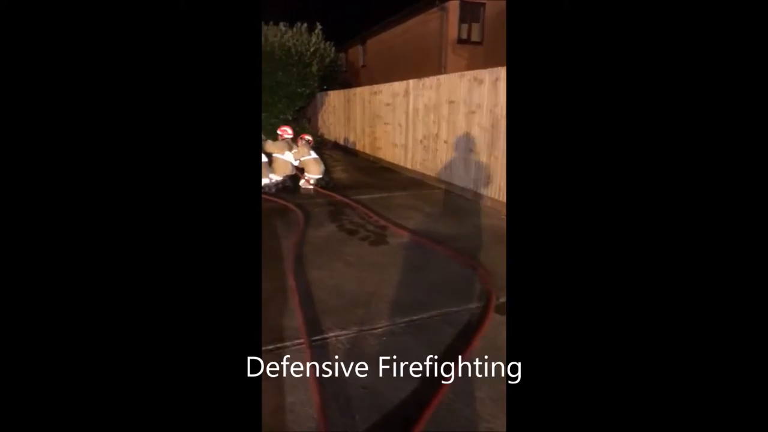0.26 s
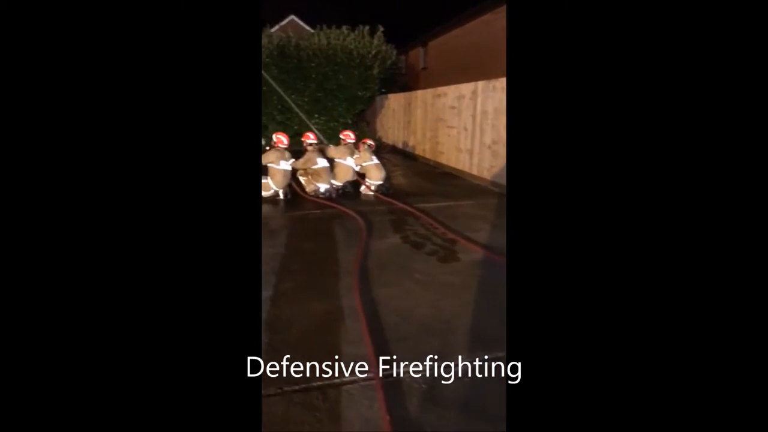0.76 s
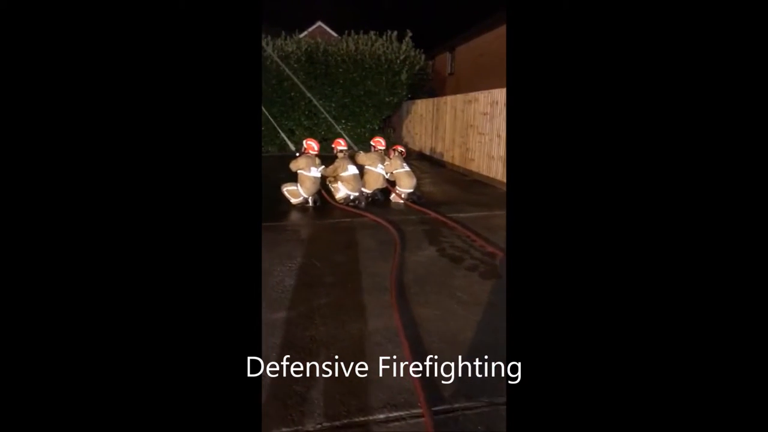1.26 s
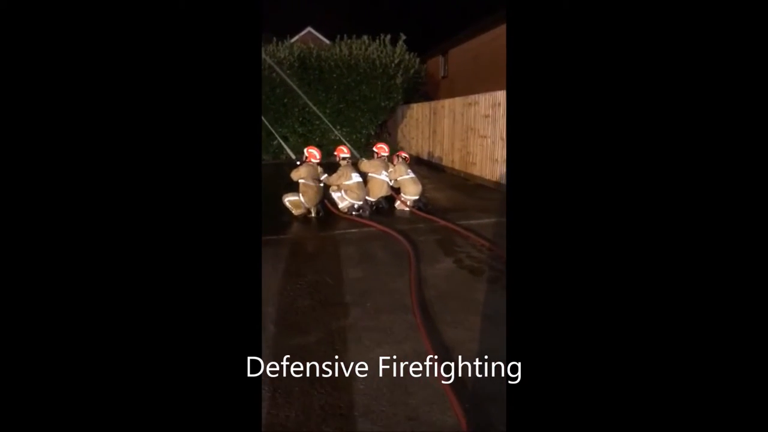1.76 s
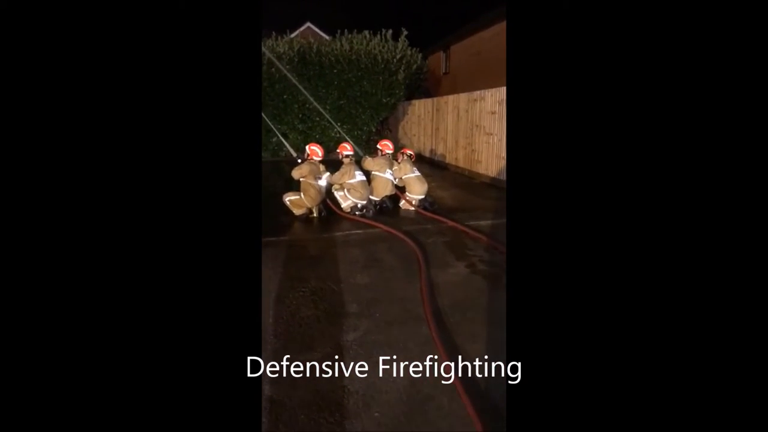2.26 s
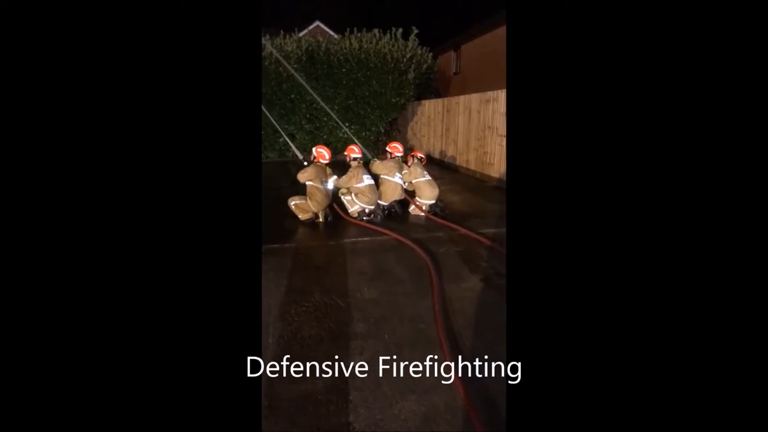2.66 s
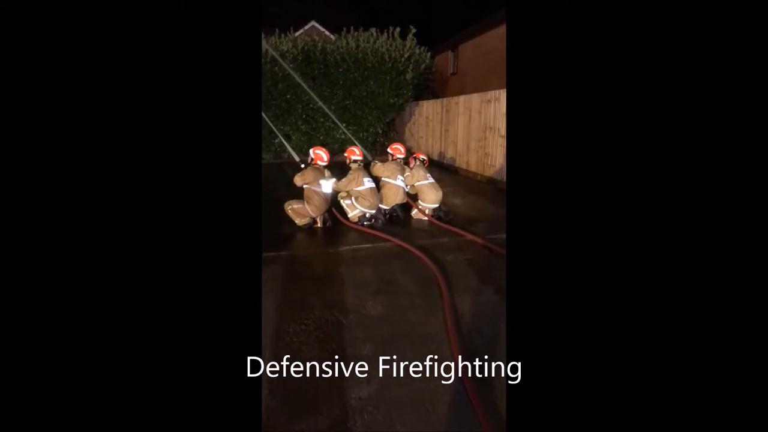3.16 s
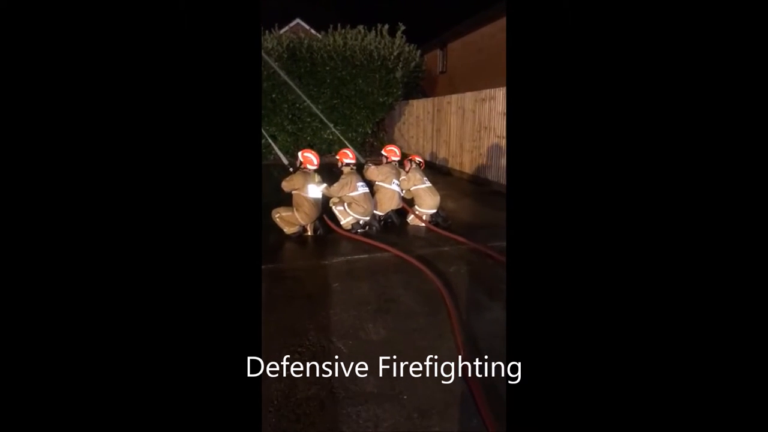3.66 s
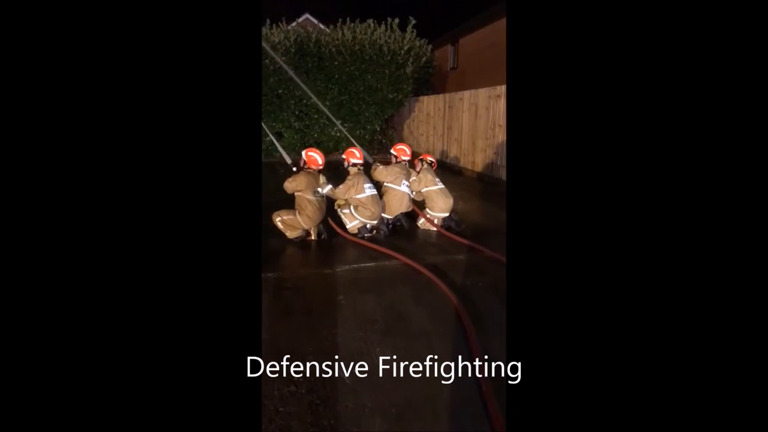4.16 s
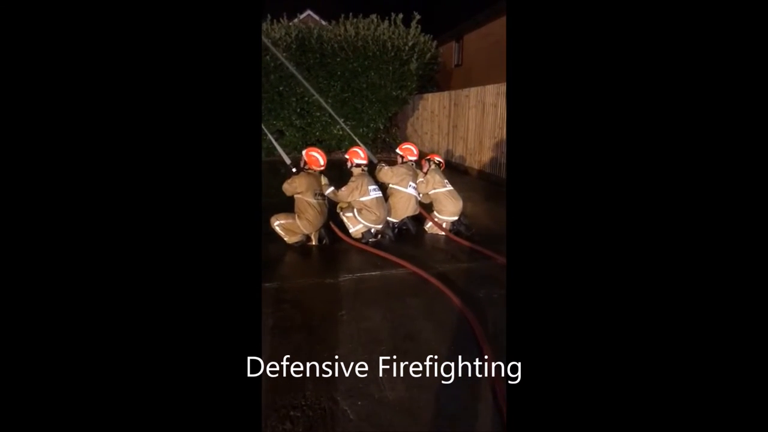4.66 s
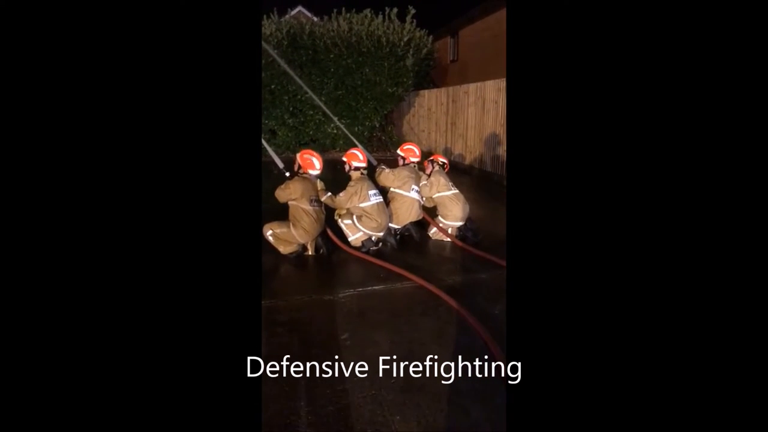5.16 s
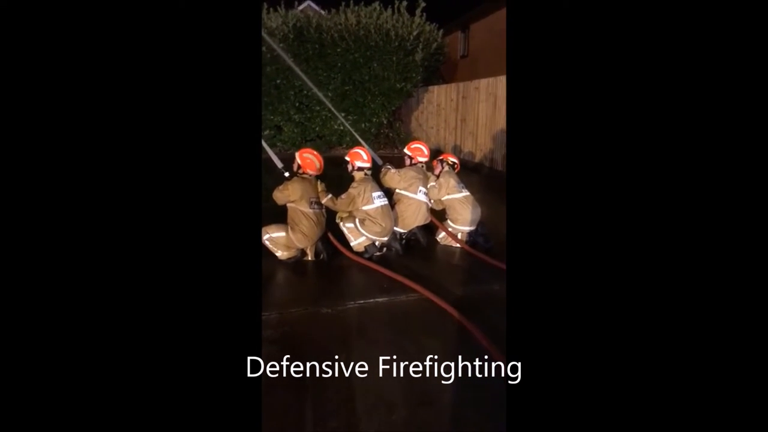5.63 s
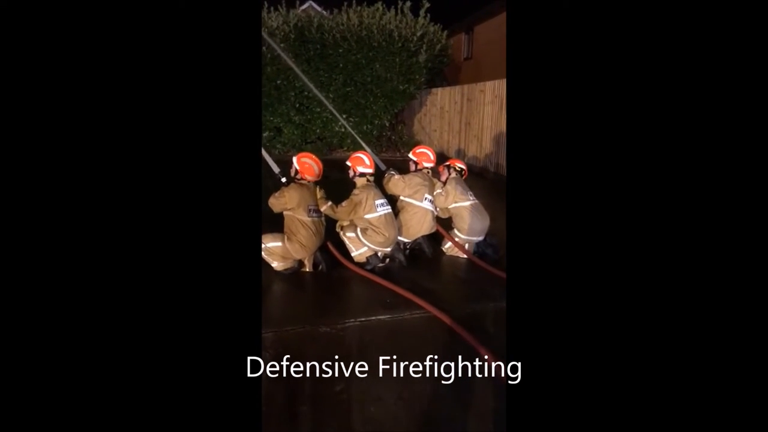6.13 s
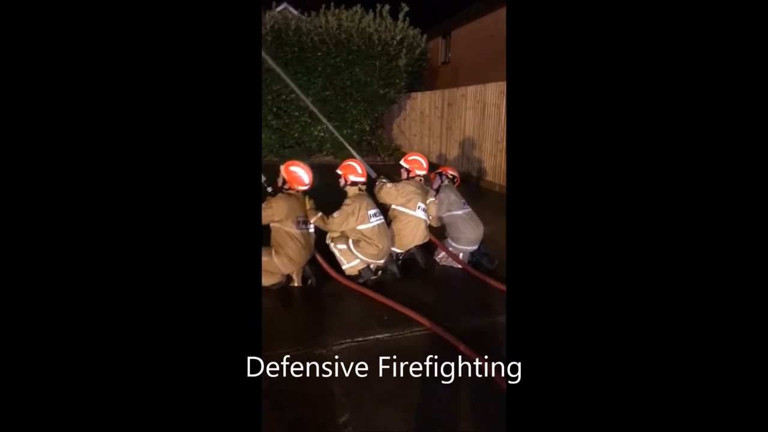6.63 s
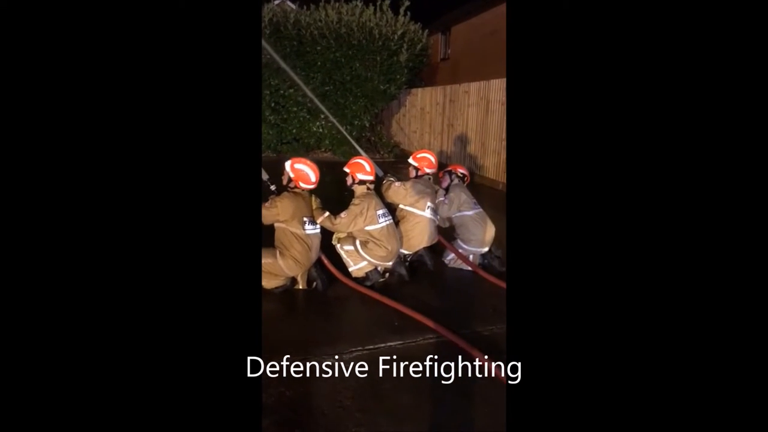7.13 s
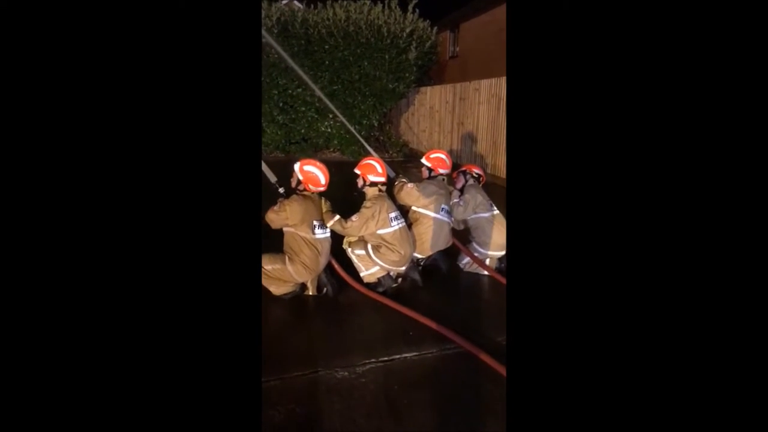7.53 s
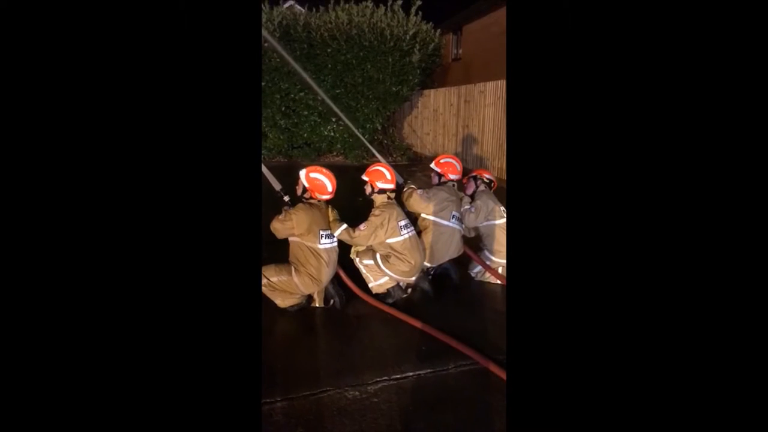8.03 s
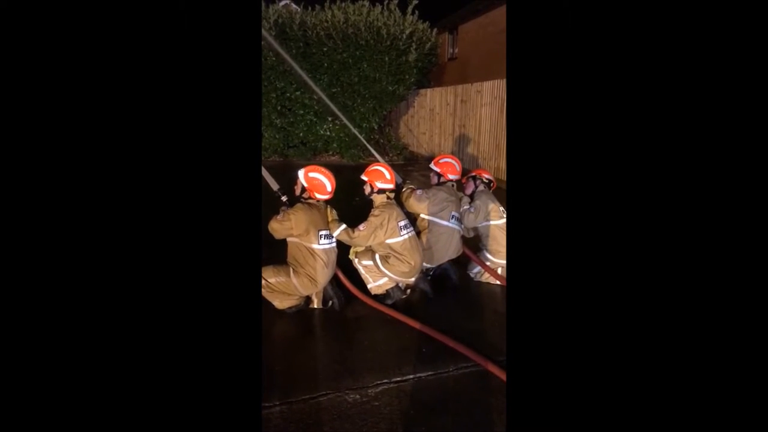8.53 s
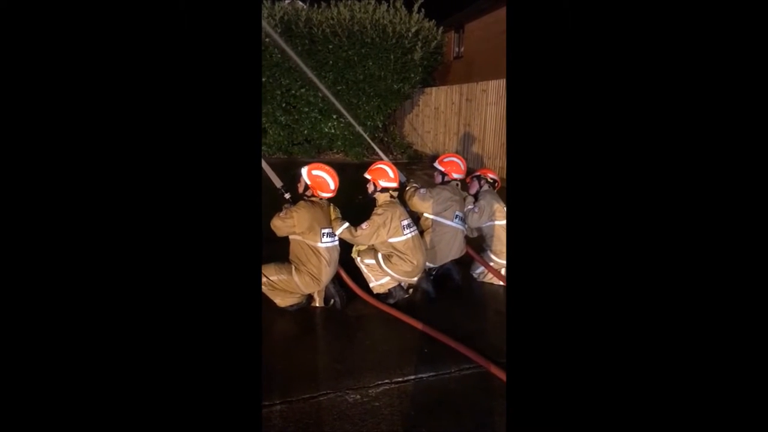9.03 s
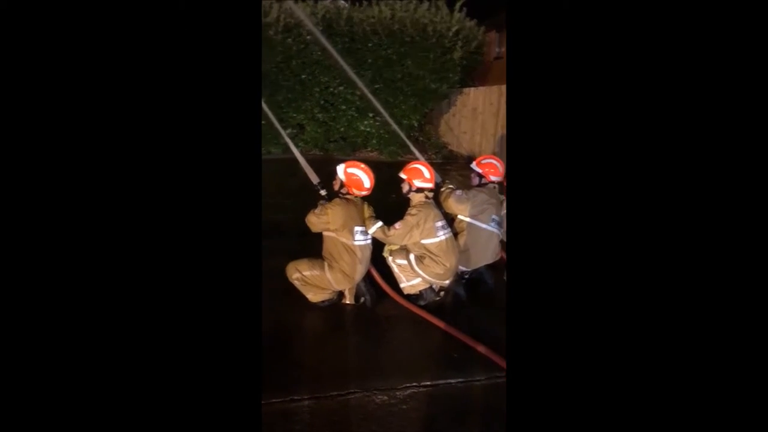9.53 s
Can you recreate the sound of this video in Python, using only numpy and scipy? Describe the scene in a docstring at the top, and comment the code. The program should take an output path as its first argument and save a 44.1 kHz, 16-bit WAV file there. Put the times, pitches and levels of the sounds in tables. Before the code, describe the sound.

From the start, fire hoses spray water across an outdoor yard with a steady, bright hiss, blended with the softer rush of spray landing farther away. Underneath, several engines run with a low, slowly pulsing hum and rumble, and pumps add a faint thin whine. Dull, soft footsteps bump the handheld microphone at irregular moments, at about 1.3 seconds, more often between 3 and 6, and again near 7 and 8. Around 4.5 seconds the hiss surges and stays slightly louder. A few brief splashes on a hard surface follow until about 5.5 seconds, and a nozzle gives a short crackling spit of air near 5.9. Throughout, the hiss occasionally dips for an instant, leaving a tiny faint ringing blip. Water and engines continue until the end, at almost 10 seconds.

```python
"""Two fire hoses throw steady jets across a yard at night, heard while walking up behind the crews.
Turbulent shear tears the water into hissing droplets, whose impacts far off merge into a rush.
Four engines radiate harmonics of their four-stroke cycles, and tones of nearby frequency beat.
Pumps whine faintly and footsteps thud. Now and then the hiss dips for an instant as a few tones ring."""
import sys
import numpy as np
from scipy import signal
from scipy.fft import rfft, irfft
from scipy.io import wavfile
from scipy.ndimage import uniform_filter1d

SR = 44100
rng = np.random.default_rng(int(sys.argv[2]) if len(sys.argv) > 2 else 0)


def dump(signal):
    """Clip the signal to [-1, 1] and save it as 16-bit WAV at the path in sys.argv[1]."""
    limited = np.clip(np.atleast_2d(signal).T, -1, 1)
    pcm = np.round(limited * 32767).astype(np.int16)
    wavfile.write(sys.argv[1], SR, pcm)


N = 431738
TIME = np.arange(N) / SR
HZ = np.fft.rfftfreq(N, 1 / SR)

# spectrum of the nozzle hiss: (frequency [Hz], relative density [dB])
HISS_SPECTRUM = [(250, -7.5), (500, -8.5), (800, -7.5), (1300, -7), (2200, -2.5), (2750, -0.5),
                 (4400, -1.03), (5600, -2.5), (7000, -2.5), (8600, -3), (9700, -4.5), (10400, -10)]
# surges as a jet swings: (time [s], rise [dB], length [s], tilt toward treble [dB])
JET_SURGES = [(.45, 1.6, 0.11, -0.5), (4.45, 2.5, 0.37, 0.5), (4.812, 1, 0.23, 0), (5.04, 2, 0.13, 0.6),
              (5.3, 0.5, 0.23, 0.5), (5.54, 1.3, 0.24, 0.5), (6.018, 1, 0.14, 0.5), (7.385, 1.9, 0.14, 1),
              (9.417, 0.5, 0.5, 0)]
# air bursting from a nozzle: (time [s], level [dB], decay [s])
NOZZLE_SPITS = [(5.852, -28.5, 0.017), (5.87, -25, 0.003), (5.878, -31, 0.025)]
# spectrum of the spray landing far off: (frequency [Hz], relative density [dB])
SPRAY_SPECTRUM = [(200, -4), (450, -9), (560, -5.5), (780, -6.5), (1030, -1), (1380, 2.5), (1600, -2),
                  (1900, -3.5), (2300, -8), (4000, -17.5)]
# a jet sweeping over something hard: (time [s], level [dB], decay [s])
JET_SPLASHES = [(4.765, -27, 0.032), (5.175, -29.5, .04), (5.31, -33, 0.054), (5.5, -37, .06)]
# peaks and hollows of the water's noise between walls: (frequency [Hz], width [Hz], gain [dB])
YARD_RESONANCES = [(1070, 120, 0.6), (1480, 86, 0.7), (1590, 80, -0.2), (1820, 140, 0.7), (2150, 140, -0.5),
                   (2530, 190, 1), (4120, 130, 0.7), (4610, 110, 1.2)]
# dips of the hiss: (time [s], hold [s], tone level [dB], lower tone [Hz], upper tone [Hz])
HISS_DIPS = [(.241, 0.0062, -45, 1055, 1604), (.54, 0.0035, -47, 2024, 2939),
             (.646, 0.0014, -41, 1345, 2300), (0.848, .022, -47, 1670, 2067), (1.35, 0, -42, 1470, 2490),
             (1.564, 0.0033, -44, 1765, 3348), (2.269, 0, -43, 1870, 5770), (2.353, 0, -41, 1750, 5300),
             (2.587, 0, -43, 2734, 5361), (3.25, 0, -43, 1281, 2770), (3.29, 0.0042, -43, 1205, 2357),
             (3.42, 0.003, -43, 1160, 1485), (3.547, 0.00093, -44, 3079, 3951), (3.654, 0, -45, 1440, 3316),
             (4.23, 0, -44, 1981, 2357), (4.315, 0.0083, -41, 1410, 1905), (4.401, 0, -42, 1399, 1905),
             (4.528, 0, -39, 1367, 4554), (5.147, 0.0017, -40, 1396, 1830), (5.704, 0, -39, 1324, 1710),
             (7.217, 0.0013, -38, 1399, 2368), (7.602, 0.0059, -43, 1302, 3154),
             (7.835, 0, -40, 1345, 2470), (8.39, 0, -39, 3746, 6416), (8.881, 0, -41, 1280, 2573),
             (9.628, 0, -42, 1270, 1711)]
# harmonics of three six-cylinder engines and a small four: (cycle multiple [1], base rms level [dB])
IDLE_HARMONICS = [(6, -38.5), (7, -52), (12, -48), (15, -49.5), (16, -58), (17, -57.5), (18, -55.5),
                  (19, -65), (20, -56), (21, -54.5), (23, -51.5), (24, -55), (25, -64), (28, -61),
                  (30, -55.5), (32, -62), (33, -59.5), (34, -61.5), (36, -60.5), (38, -60), (39, -59.5),
                  (40, -58), (42, -71), (44, -70), (46, -65), (48, -62.5), (49, -64.5)]
PUMP_HARMONICS = [(6, -38.5), (12, -43), (13, -59), (14, -69), (15, -64), (16, -55), (18, -43), (19, -63),
                  (20, -54.5), (21, -57), (22, -59), (23, -72), (24, -57.5), (28, -60), (30, -72.5)]
FAR_HARMONICS = [(6, -46), (8, -51.5), (9, -59), (10, -46.5)]
SMALL_HARMONICS = [(4, -69), (6, -44)]
# gains of the idling engine along the walk: (time [s], firing tone [dB], octave [dB], growl [dB])
IDLE_SWELLS = [(0, -3, 3, -2), (.7, 1, 10.5, 9), (1.5, -11, 4, 6.5), (3.3, -16, -6, 7.5), (5.3, -5, 1, 2),
               (6.8, -5, -0.5, 6.5), (8, 2, -0.5, 2), (9.79, -1.5, 1, -9)]
# gains of the pumping engine between walls: (time [s], firing tone [dB], octave [dB], twelfth [dB])
PUMP_SWELLS = [(0, -4, -14, 3), (0.35, 6.5, -3, -16), (0.9, 3, -1, -3.5), (1.3, 2.5, 3, -4),
               (2, 1, 0.5, -2), (2.8, 2, -1, 1.5), (3.3, -27, -19, -11), (3.7, 5, 5, -16),
               (4.1, -4, -7, 1.5), (4.4, 3.5, -16, -2.5), (4.75, 0, -15, -3), (5.05, 3.5, -11, -20),
               (5.65, -3.5, -11, -5), (6.05, 4, -0.5, -4.5), (6.45, -1, 1.5, 0), (7.5, -2, 0, 0),
               (8.3, -2.5, -6.5, 0), (9.79, -5, 0, 0)]
# spectrum of the rumble of engines and yard: (frequency [Hz], relative density [dB])
RUMBLE_SPECTRUM = [(10, -26), (25, -12.5), (38, -1), (52, 1.5), (70, 4.5), (100, -2.5), (140, -6),
                   (175, -2.5), (220, -6.5), (300, -9), (420, -17), (700, -36)]
# strength of the rumble along the walk: (time [s], level [dB])
RUMBLE_LEVELS = [(0, -43), (1.8, -43.5), (3.2, -41.5), (3.9, -40.5), (5.1, -42.5), (6.1, -40.5), (6.6, -45),
                 (8.3, -44), (9.79, -41.5)]
# whines of the pumps: (frequency [Hz], early level [dB], late level [dB], time of change [s])
PUMP_WHINES = [(346.5, -51.5, -61.5, 1.7), (540, -60, -55.5, 3.9)]
# jolts of walking: (time [s], level [dB], decay [s])
STEP_THUDS = [(.69, -38, .05), (1.32, -30.5, 0.049), (2.5, -40, 0.036), (3.28, -30, .03),
              (3.335, -34, .035), (3.83, -38, 0.14), (4.055, -35, 0.024), (4.19, -35, 0.043),
              (4.68, -33.5, .04), (4.83, -30, .018), (5.31, -28.5, 0.052), (5.465, -30, .025),
              (5.87, -34, .04), (7.205, -27.5, 0.032), (7.98, -31.5, 0.068)]

DIP_FADE_S = 0.019


def jets(shielded_db=-34, open_db=-32.5, open_at_s=4.66, opening_s=0.13, crossover_hz=5000):
    """Turbulent shear tears the jets into hissing drops, louder once out of the crews' acoustic shadow."""
    shear = turbulence(patchy_db=0.9, lingering_db=0.56)
    droplets = gain_of(-9.5) * drops(per_s=5000, spread_db=2)
    hiss = colour(shear + droplets, HISS_SPECTRUM)
    roar = low_band(hiss, crossover_hz)
    openness = smooth_step(open_at_s, opening_s)
    level_db = shielded_db + (open_db - shielded_db) * openness + 0.78 * wander(rate_hz=24)
    tilt_db = -0.25 * openness
    for s, rise_db, length, fizz_db in JET_SURGES:
        swell = np.exp(-(2 * (TIME - s) / length) ** 2)
        level_db += rise_db * swell
        tilt_db += fizz_db * swell
    return roar * gain_of(level_db - tilt_db) + (hiss - roar) * gain_of(level_db + tilt_db)


def turbulence(patchy_db, lingering_db, patch=(9, 16), streak=(3, 140)):
    """Intermittency: noise varies in quick wide patches and lasting narrow streaks, each (bins, frames)."""
    spectra = signal.stft(rng.standard_normal(N), nperseg=512)[2]
    drift_db = np.zeros(spectra.shape)
    for depth_db, (bins, frames) in ((patchy_db, patch), (lingering_db, streak)):
        bands = uniform_filter1d(rng.standard_normal(spectra.shape), bins, axis=0)
        drift_db += depth_db * unit_rms(uniform_filter1d(bands, frames, axis=1))
    return unit_rms(signal.istft(spectra * gain_of(drift_db), nperseg=512)[1][:N])


def drops(per_s, spread_db):
    """Shot noise: independent impacts, mostly small, a few large."""
    sizes = gain_of(spread_db * np.minimum(rng.exponential(1, N), 4))
    return unit_rms(sizes * rng.choice([-1, 1], N) * (rng.random(N) < per_s / SR))


def spits():
    """Sudden expansion: air pockets burst out of a nozzle with a short crackle."""
    crackle = colour(rng.standard_normal(N), [(1000, -18), (3400, 1), (5000, -4), (10000, -5)])
    return bursts(NOZZLE_SPITS, rise_s=0.00023) * crackle


def spray(level_db=-38.5):
    """Incoherent summation: countless drops land on walls and ground and merge into a rush."""
    rush = turbulence(patchy_db=1.6, lingering_db=0.6, patch=(4, 6), streak=(2, 80))
    spatter = gain_of(-9) * drops(per_s=1800, spread_db=2.5)
    return colour(rush + spatter, SPRAY_SPECTRUM) * gain_of(level_db)


def splashes():
    """Impact noise: water breaks on a hard surface in short diffuse swells."""
    spectrum = [(1500, -22), (2400, 0), (2900, 7), (3500, -5), (4500, -21)]
    return bursts(JET_SPLASHES, rise_s=0.02) * colour(rng.standard_normal(N), spectrum)


def dipped(x, floor_db=-31.5, above_hz=235):
    """Amplitude modulation: at each dip everything above the bass sinks and comes straight back."""
    level = np.ones(N)
    for s, hold, *_ in HISS_DIPS:
        level *= dip_ramp(TIME - s, hold)
    bass = low_band(x, above_hz)
    return bass + (x - bass) * np.maximum(np.sin(np.pi / 2 * level), gain_of(floor_db))


def dip_tones(faint_count=9, faint_db=-48, faint_range_hz=(1800, 9980), size=4096):
    """Superposition: two clear sinusoids and fainter scattered ones ring through each dip."""
    out = np.zeros(N)
    offsets = np.arange(size) - size // 2
    t = offsets / SR
    for s, hold, db, *clear_hz in HISS_DIPS:
        faint_hz = np.exp(rng.uniform(*np.log(faint_range_hz), faint_count))
        hz = np.concatenate([clear_hz, faint_hz])
        gains = gain_of([db] * len(clear_hz) + [faint_db] * faint_count)
        tones = gains @ np.sin(2 * np.pi * (hz[:, None] * t + rng.random((len(hz), 1))))
        swell = np.cos(np.pi / 2 * dip_ramp(t, hold))
        out[round(s * SR) + offsets] += np.sqrt(2) * swell * tones
    return out


def engines():
    """Beating: four engines run at different speeds, so their neighbouring tones interfere."""
    firing, octave, growl = curves(IDLE_SWELLS)
    idle_swells = {6: firing, 12: octave, 18: growl, 21: growl, 23: growl / 2}
    pump_swells = dict(zip((6, 12, 18), curves(PUMP_SWELLS)))
    idling = engine(IDLE_HARMONICS, idle_swells, cycle_hz=7.508, drift=0.00056)
    pumping = engine(PUMP_HARMONICS, pump_swells, cycle_hz=9.173, drift=0.00088)
    far = engine(FAR_HARMONICS, {}, cycle_hz=8.959, drift=0.00052)
    small = engine(SMALL_HARMONICS, {}, cycle_hz=10.943, drift=0.00051, fading_db=-4.5)
    return idling + pumping + far + small


def engine(harmonics, swells, cycle_hz, drift, fading_db=0.5, in_step_s=5.17, in_step_below_hz=100):
    """Periodic firing makes harmonics; those in swells follow the walk, the rest fade by reflection."""
    turns = np.cumsum(cycle_hz * (1 + drift * wander(rate_hz=1.62))) / SR
    turns -= turns[round(in_step_s * SR)]  # the low tones of all engines fall into step here
    out = np.zeros(N)
    for multiple, db in harmonics:
        swell_db = swells.get(multiple, fading_db * wander(rate_hz=0.35))
        lag = rng.random() * (multiple * cycle_hz > in_step_below_hz)
        out += gain_of(db + swell_db) * np.sin(2 * np.pi * (multiple * turns + lag))
    return np.sqrt(2) * out


def rumble():
    """Low-frequency noise of the engines and the yard varies in strength along the walk."""
    noise = colour(rng.standard_normal(N), RUMBLE_SPECTRUM)
    return noise * gain_of(curves(RUMBLE_LEVELS)[0] + 0.57 * wander(rate_hz=1.7))


def whines(change_s=0.25):
    """Frequency and amplitude modulation: thin pump tones waver, each shifting level once on the walk."""
    out = np.zeros(N)
    for hz, early_db, late_db, s in PUMP_WHINES:
        turns = np.cumsum(hz * (1 + 0.00282 * wander(rate_hz=4.9))) / SR
        level_db = early_db + (late_db - early_db) * smooth_step(s, change_s)
        out += gain_of(level_db + 3 * wander(rate_hz=3.9)) * np.sin(2 * np.pi * turns)
    return out


def footsteps():
    """Structure-borne sound: steps jolt the hand-held microphone with dull thuds."""
    thud = colour(rng.standard_normal(N), [(70, -8), (140, 9), (260, 2), (400, -13.5), (800, -20)])
    return bursts(STEP_THUDS, rise_s=0.0025) * thud


def gain_of(db):
    """Decibels as an amplitude ratio."""
    return 10 ** (np.asarray(db) / 20)


def unit_rms(x):
    """Normalisation to rms 1."""
    return x / np.sqrt(np.mean(x ** 2) + 1e-20)


def curves(rows):
    """Linear interpolation of each column of a time table to every sample."""
    times, *columns = np.transpose(rows)
    return [np.interp(TIME, times, column) for column in columns]


def smooth_step(at_s, width_s):
    """A sigmoid transition from 0 to 1."""
    return 0.5 + 0.5 * np.tanh((TIME - at_s) / width_s)


def dip_ramp(offset_s, hold_s):
    """A trapezoidal envelope: 0 at the bottom of a dip, rising to 1 on either side."""
    return np.clip((abs(offset_s) - hold_s / 2) / DIP_FADE_S, 0, 1)


def bursts(rows, rise_s):
    """The envelope of transients with exponential rise and decay."""
    out = np.zeros(N)
    for s, db, decay in rows:
        age = np.maximum(TIME - s, 0)
        out += gain_of(db) * (1 - np.exp(-age / rise_s)) * np.exp(-age / decay)
    return out


def wander(rate_hz, size=2048):
    """Slow random fluctuation: low-passed noise of rms 1."""
    hz = np.fft.rfftfreq(size, N / SR / size)
    slow = irfft(rfft(rng.standard_normal(size)) / (1 + (hz / rate_hz) ** 2))
    return np.interp(np.arange(N), np.linspace(0, N, size), unit_rms(slow))


def colour(x, points):
    """Spectral shaping through (frequency [Hz], gain [dB]) points on a log axis, at rms 1."""
    hz, db = np.transpose(points)
    skirts = np.minimum(HZ / hz[0], 1) * np.minimum(hz[-1] / (HZ + 1), 1)
    shape_db = np.interp(np.log(HZ + 1), np.log(hz), db)
    return unit_rms(irfft(rfft(x) * skirts * gain_of(shape_db), N))


def low_band(x, cutoff_hz):
    """Zero-phase low-pass filtering."""
    return irfft(rfft(x) / (1 + (HZ / cutoff_hz) ** 8), N)


def peaked(x, peaks):
    """Bell-shaped resonances and notches: (frequency [Hz], width [Hz], gain [dB])."""
    shape_db = sum(db * np.exp(-((HZ - hz) / width) ** 2) for hz, width, db in peaks)
    return irfft(rfft(x) * gain_of(shape_db), N)


def scene():
    """Superposition at one microphone: all sources add, and both channels are alike."""
    water = peaked(jets() + spray() + splashes(), YARD_RESONANCES)
    sources = water + spits() + footsteps() + engines() + rumble() + whines()
    mono = dipped(sources) + dip_tones()
    return np.array([mono, mono])


def record(dry, cutoff_hz=10500):
    """Linear filtering: the microphone port cuts two shallow notches, and a low-pass limits the band."""
    notched = peaked(dry, [(4900, 230, -2.5), (7740, 510, -3)])
    lowpass = signal.firwin(401, cutoff_hz, window=("kaiser", 8), fs=SR)
    return signal.oaconvolve(notched, lowpass[None], "same")


dry = scene()
out = record(dry)
dump(out)
```